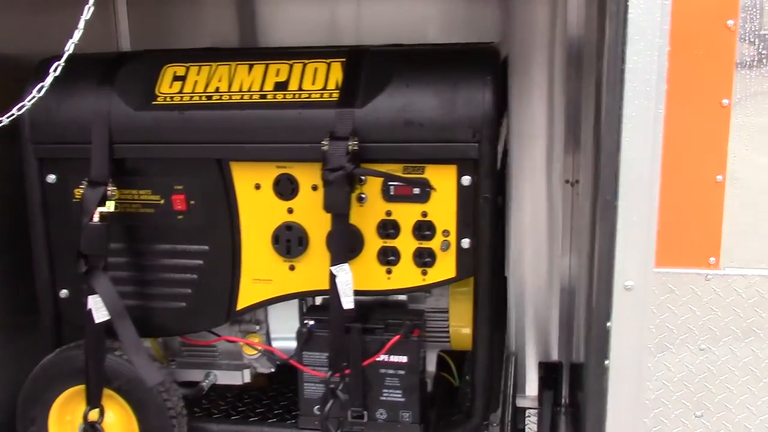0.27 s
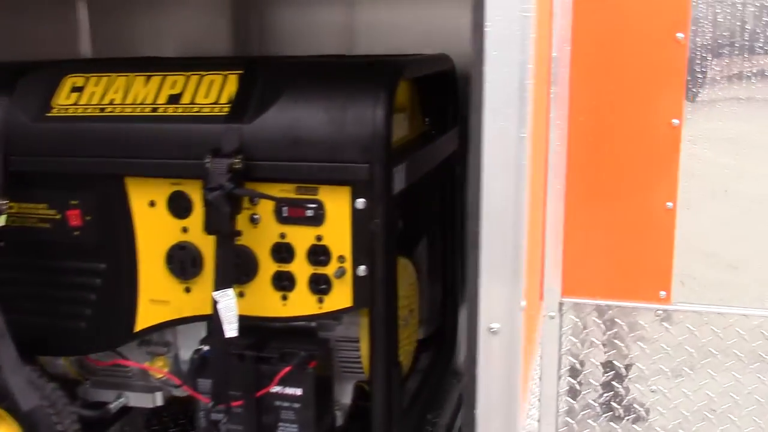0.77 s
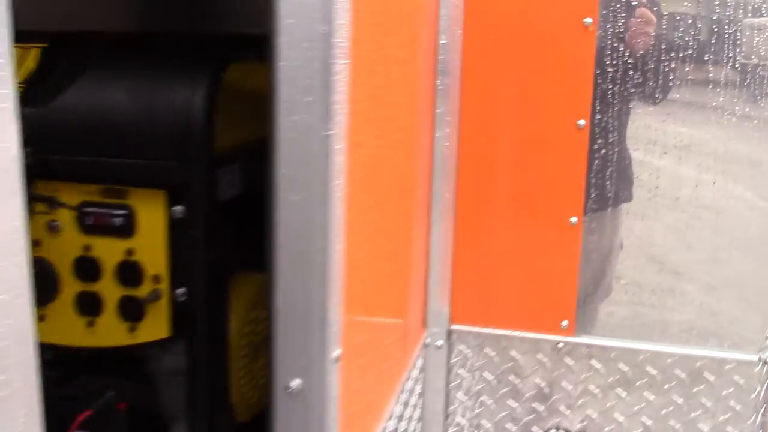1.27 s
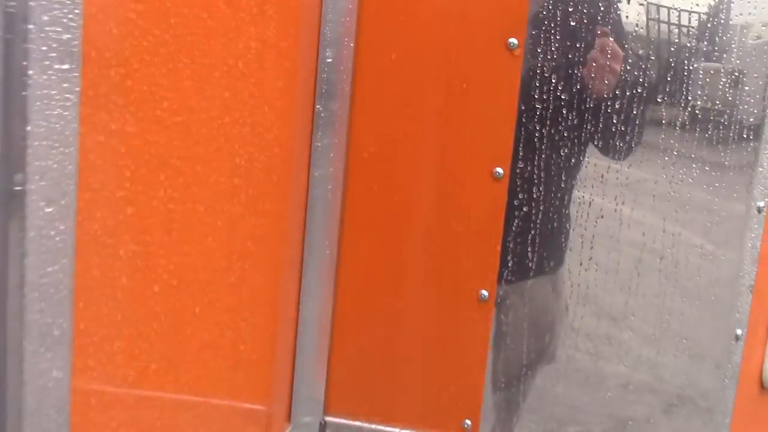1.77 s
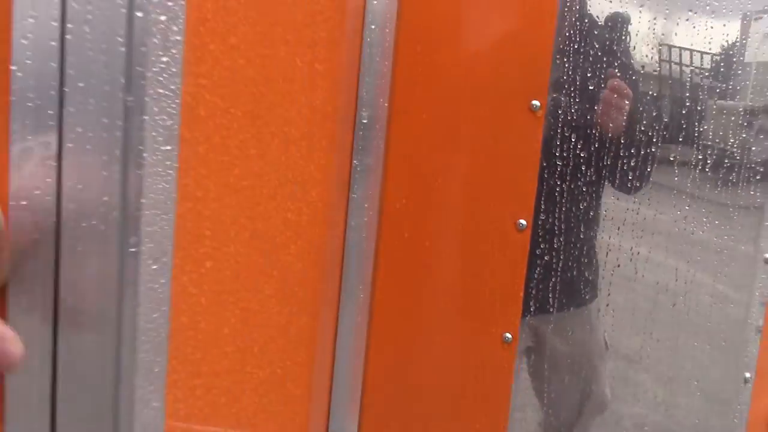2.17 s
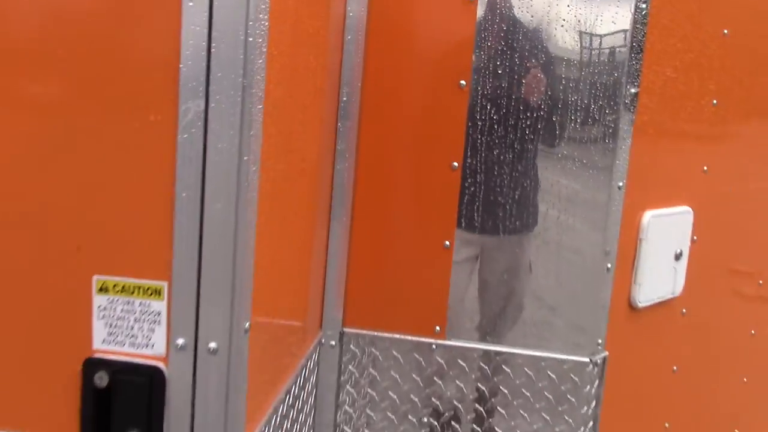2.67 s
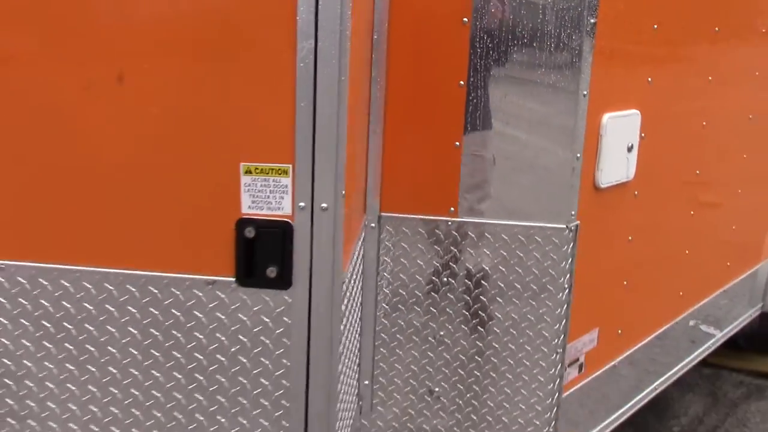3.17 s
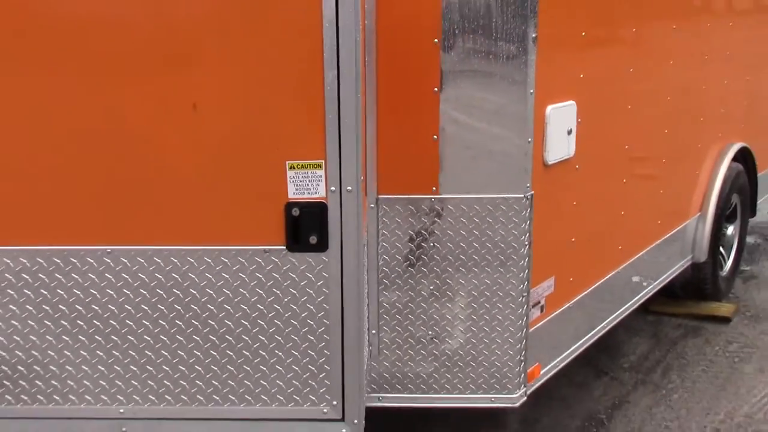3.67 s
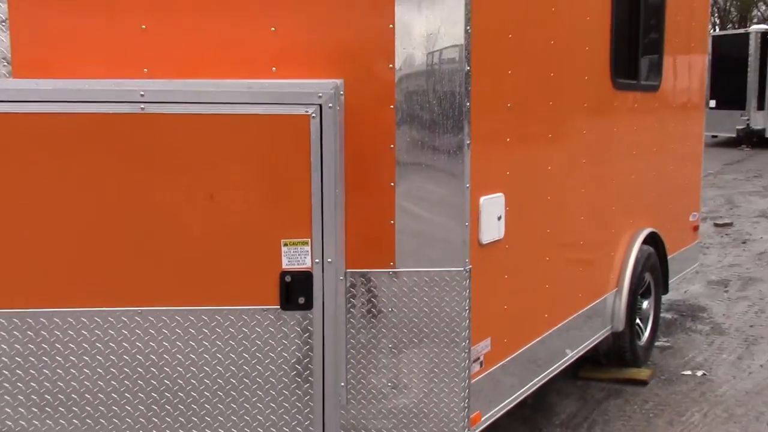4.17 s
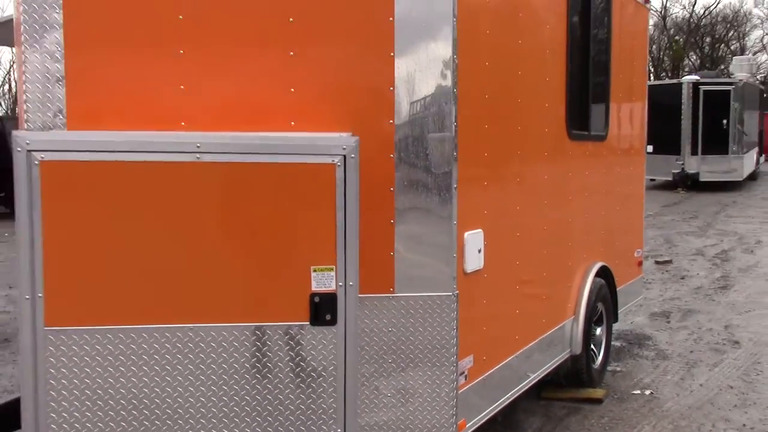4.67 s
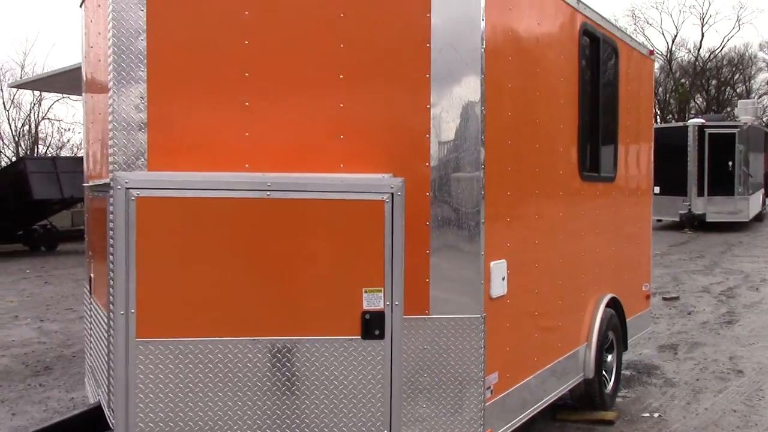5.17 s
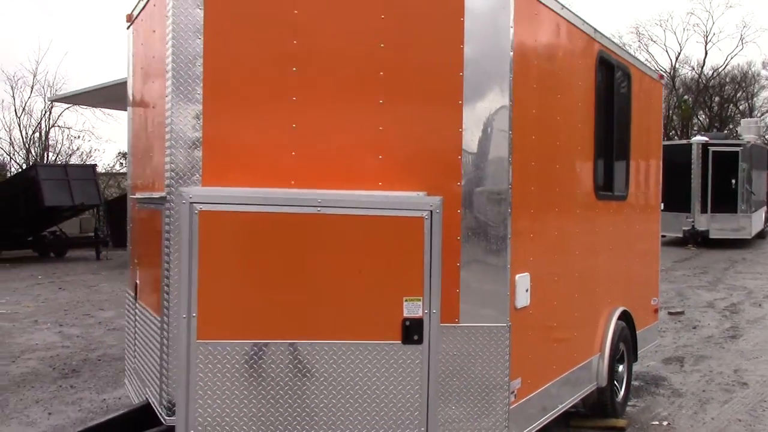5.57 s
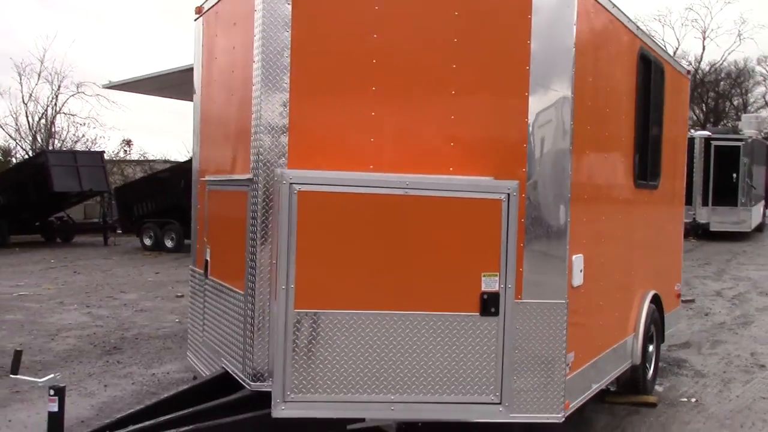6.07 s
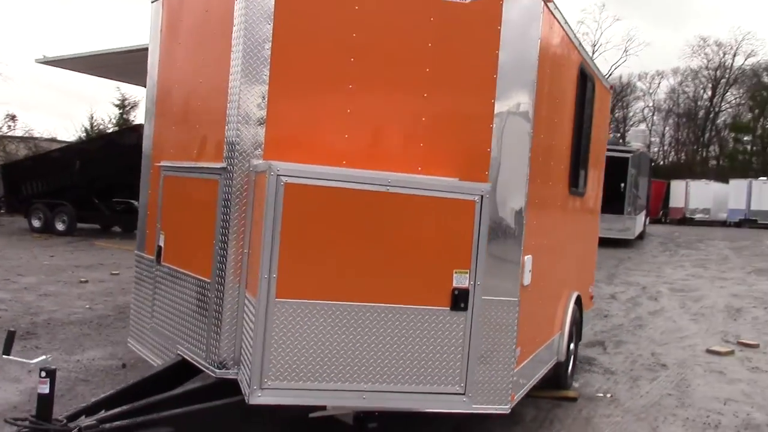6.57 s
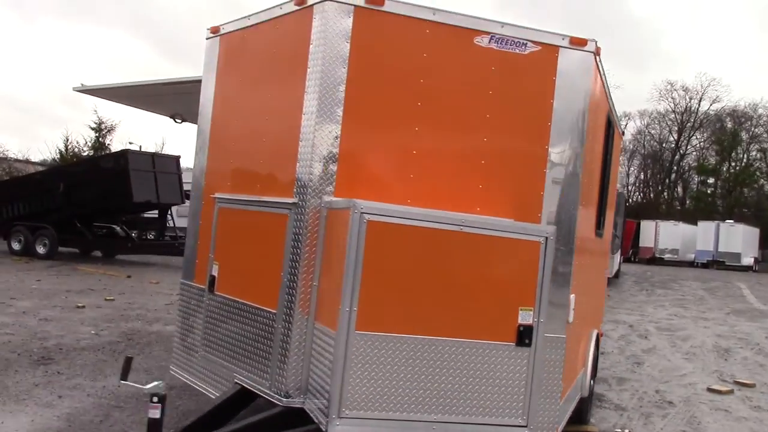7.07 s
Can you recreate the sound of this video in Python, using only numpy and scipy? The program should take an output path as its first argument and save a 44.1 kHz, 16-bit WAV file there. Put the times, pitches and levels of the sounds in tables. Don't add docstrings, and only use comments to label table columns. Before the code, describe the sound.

An open yard, heard close up, with far road hum and low wind buffeting. Soft cloth rustles come at 0.1-0.25 s, a metal tick near 0.47, and a cluster of knocks with short hollow panel thuds around 0.65-0.85. From 0.9 to 1.2 a hook scrapes and chatters on metal. After a brief hand rustle, the sheet-metal door slams at 1.55 with a deep boom, rough panel shudder and a strong push of air; the latch bangs brighter and sharper at 1.82, with a short rattle. The hum then sits lower. Light ticks and gravel scuffs follow from 2.1, with clearer shoe scrapes at 3.1-3.3 and sparse ones later. Thin, wavering squeals sound far away between 4.15 and 5.75. A small low thud comes at 5.9. Wind rumble swells from 6.3 and is heaviest at the end, about 7.3.

```python
import sys
import numpy as np
from scipy import signal
from scipy.fft import rfft, irfft, next_fast_len
from scipy.io import wavfile
from scipy.ndimage import uniform_filter1d

SR = 44100
rng = np.random.default_rng(int(sys.argv[2]) if len(sys.argv) > 2 else 0)


def to_linear_factor(level_db):
    exponent = np.asarray(level_db, float) / 20
    return 10 ** exponent


def store_pcm(level_fs):
    pcm = np.round(np.clip(level_fs, -1, 1) * 32767).astype(np.int16)
    wavfile.write(sys.argv[1], SR, np.atleast_2d(pcm).T)


N = 323253
T = np.arange(N) / SR
SLAM_S = 1.549


def level(x):
    return x / np.sqrt(np.mean(x ** 2))


def band(x, lo_hz, hi_hz, order=2):
    sos = signal.butter(order, [lo_hz, hi_hz], "bandpass", fs=SR, output="sos")
    return signal.sosfilt(sos, x)


def even_band(x, lo_hz, hi_hz):
    return band(x, lo_hz, hi_hz, order=3) / np.sqrt(2 * (hi_hz - lo_hz) / SR)


def coloured(shape):
    hz, db = np.transpose(shape)
    size = next_fast_len(N)
    bin_hz = np.arange(size // 2 + 1) * SR / size
    gain = to_linear_factor(np.interp(np.log(bin_hz + 1), np.log(hz), db))
    return level(irfft(rfft(rng.standard_normal(size)) * gain, size)[:N])


def walk(rate_hz):
    hold = int(SR / rate_hz)
    steps = np.repeat(rng.standard_normal(N // 100), hold)[:N]
    return level(uniform_filter1d(uniform_filter1d(steps, hold), hold))


def ring(x, hz, t60_s):
    pole = np.exp(2j * np.pi * hz / SR - np.log(1000) / (t60_s * SR))
    return signal.lfilter([1], [1, -pole], x).imag


def bursts(table, shape, grit_db, spread, focus_db):
    out, body, edge = np.zeros((3, N + SR))
    size = SR // 6
    t = np.arange(size) / SR
    for start_s, peak_db, hz, body_db, edge_db, span_s in table:
        impacts = np.minimum(rng.exponential(size=size // 30 + 1), 2.5)
        sizes_db = grit_db * np.repeat(impacts, 30)[:size]
        envelope = to_linear_factor(peak_db) * level(to_linear_factor(sizes_db)) * shape(t, max(span_s, .004))
        push = envelope * rng.standard_normal((4, size))
        here = slice(int(start_s * SR), int(start_s * SR) + size)
        out[here] += even_band(push[0], hz / spread, min(hz * spread, 6800))
        out[here] += to_linear_factor(focus_db) * even_band(push[3], hz / 1.093, hz * 1.13)
        body[here] += to_linear_factor(body_db) * push[1]
        edge[here] += to_linear_factor(edge_db) * push[2]
    return (out + even_band(body, 355, 1630) + even_band(edge, 6900, 11900))[:N]


# start_s [s], level_db [dB]
GUST_BEFORE_SLAM = [(0, -28), (.15, -20.5), (.35, -20), (.8, -32), (1.45, -30)]
GUST_AFTER_SLAM = [(1.95, -29.5), (2.3, -39.5), (2.7, -34.5), (4.1, -39.5), (4.75, -32), (5.15, -30),
                   (5.4, -28), (5.9, -27.5), (6.15, -27), (6.35, -19), (6.85, -18.5), (7.0, -14),
                   (7.33, -11)]


def gust():
    usual_db = -30.5
    return np.interp(T, *np.transpose(list(GUST_BEFORE_SLAM) + list(GUST_AFTER_SLAM))) - usual_db


# start_s [s], half_length_s [s], low_push_db [dB], flutter_push_db [dB]
PUFFS = [(0.095, 0.03, 7, 1), (0.39, 0.034, 9.5, -9), (0.572, 0.094, 6.5, -5), (0.935, 0.057, 10.5, 9),
         (1.16, 0.07, 5, 6), (1.416, 0.018, 14, 7), (1.547, 0.045, 16.5, 24), (1.65, 0.075, 18, 31.5),
         (1.857, 0.05, 7, 23.5), (2.262, 0.063, 13, -6), (2.496, .06, -2.5, 8), (3.873, 0.046, 11, -8),
         (4.28, 0.07, 2, 7), (5.03, 0.059, 6.5, 14), (5.18, 0.066, 10.5, 11.5), (5.947, 0.057, 7, 10),
         (6.009, 0.025, 12.5, -1), (6.884, 0.046, 9, 7), (7.083, 0.038, 2.5, 13.5), (7.257, 0.057, -0.5, 8)]


def wind():
    bells = [np.exp(-((T - start_s) / half_s) ** 2) for start_s, half_s, *_ in PUFFS]
    low_db, flutter_db = np.transpose(PUFFS)[2:] @ bells
    # low_hz, high_hz, usual_db, slope (dB per dB of gust), share of flutter in the push
    layers = [(3.94, 20.2, -18, 0.58, 0.015), (23.95, 51, -30.0, 0.94, .02),
              (54, 99.3, -38, 0.74, 0.39), (90.4, 169, -48.5, 0.61, 1.0)]
    out, gust_db = np.zeros(N), gust()
    for lo_hz, hi_hz, usual_db, slope, share in layers:
        eddies = level(band(rng.standard_normal(N), lo_hz, hi_hz, order=3))
        eddies /= np.sqrt(uniform_filter1d(eddies ** 2, int(.1 * SR)) + 0.44)
        push_db = (1 - share) * low_db + share * flutter_db
        out += to_linear_factor(usual_db + slope * gust_db + push_db) * eddies
    return 0.68 * np.tanh(out / 0.73)


# hz [Hz], level_db [dB per Hz]
YARD_SPECTRUM = [(71, -4), (120, 4), (488, -8.5), (899, -8), (1900, -17), (2750, -24), (5060, -28.5),
                 (8080, -40.5), (15500, -48)]
# hz [Hz], level_db [dB per Hz]
COMPARTMENT_SPECTRUM = [(71, -5), (120, -2.5), (188, -5), (240, -9.5), (282, -8), (319, -13.5), (441, -12),
                        (541, -13.5), (975, -14.5), (2590, -25.5), (2980, -29.5), (4570, -30),
                        (15500, -54.5)]
# start_s [s], depth_db [dB], fall_s [s], recovery_s [s]
DUCKS = [
    (1.533, -6, 0.07, 0.0067),
    (1.6, -1, .04, 0.13),
    (1.685, 19, .015, .015),
]


def yard():
    open_db, shut_db, wind_duck = -34, -45.5, 0.071
    flicker_db = .5 * walk(9)
    duck_db = np.zeros(N)
    for start_s, depth_db, fall_s, recovery_s in DUCKS:
        corners_s = [start_s - fall_s, start_s, start_s + recovery_s]
        duck_db += depth_db * np.interp(T, corners_s, [0, 1, 0])
    shut = T > SLAM_S
    heard_db = np.where(shut, shut_db - wind_duck * np.maximum(gust(), 0), open_db)
    hum = np.where(shut, to_linear_factor(5) * coloured(YARD_SPECTRUM), to_linear_factor(4.5) * coloured(COMPARTMENT_SPECTRUM))
    return hum * to_linear_factor(heard_db - duck_db + flicker_db)


# start_s [s], peak_db [dB], edge_db [dB re peak], length_s [s]
CLOTH = [
    (0.1176, -26.5, -7.5, 0.025),
    (0.167, -24.5, -27, 0.018),
    (0.227, -32, -18, 0.026),
    (1.393, -31.5, -12, 0.029),
    (1.437, -26, -13, 0.012),
    (1.715, -38.5, -24, 0.02),
    (1.83, -22.5, -9, 0.027),
    (1.866, -39, -15, 0.12),
    (1.977, -38, -16, 0.023),
    (2.034, -44.5, -11, 0.054),
]
# start_s [s], peak_db [dB], centre_hz [Hz], edge_db [dB re peak], length_s [s]
SCRAPES = [(0.908, -35, 2520, -26, 0.011), (0.927, -15.5, 5160, -15, 0.02), (0.943, -10, 4370, -25, 0.013),
           (0.992, -20.5, 2140, -16, 0.027), (1.046, -18, 3470, -12.5, 0.012),
           (1.055, -20, 2350, -15, 0.024), (1.113, -22.5, 2070, -31, 0.031),
           (1.13, -18.5, 2320, -33, 0.013), (1.1397, -18, 1900, -18.5, 0.014),
           (1.207, -26.5, 4500, -20, 0.017), (3.1905, -29, 1870, -34, 0.015),
           (3.2, -27.5, 1700, -44, 0.015), (3.301, -27.5, 1720, -3, 0.021)]
# start_s [s], peak_db [dB], edge_db [dB re peak], length_s [s]
GRAVEL = [(2.106, -43, -6, 0.049), (2.168, -39.5, -10, 0.059), (2.24, -47, -12, 0.031),
          (2.303, -40, -24, 0.027), (2.358, -37.5, -15, 0.026), (2.45, -46, -13, 0.11),
          (3.173, -42, -27, 0.032), (3.388, -48, 5, 0.016), (3.792, -41.5, -22, 0.054),
          (4.38, -47, -7, 0.056), (4.47, -42, -20, 0.056), (4.992, -47, -5, 0.039),
          (5.0494, -46.5, -8, 0.067), (5.096, -48, -15, 0.046), (5.179, -42.5, -17, 0.028),
          (5.917, -45, -37, 0.016), (6.592, -45.5, -20, 0.065), (6.636, -45, -12, 0.037),
          (7.11, -46, -6, 0.13), (7.138, -32, -22, 0.022)]
# start_s [s], peak_db [dB], edge_db [dB re peak], length_s [s]
SCUFFS = [
    (2.127, -34.5, -21, 0.056),
    (3.071, -38.5, -14, 0.084),
    (3.293, -28.5, -7, 0.02),
    (3.844, -40.5, -25, 0.081),
    (3.906, -33, -16, 0.023),
    (4.554, -35.5, -13, 0.029),
]


def scrapes():
    drags = [(s, db, hz, -1, edge_db, span_s) for s, db, hz, edge_db, span_s in SCRAPES]
    rustles = []
    # centre_hz, body_db re peak
    for table, hz, body_db in [(CLOTH, 5000, 2), (GRAVEL, 4400, -10), (SCUFFS, 4000, 1.5)]:
        rustles += [(s, db, hz, body_db, edge_db, span_s) for s, db, edge_db, span_s in table]

    def bite(t, span_s):
        return np.minimum(t / 0.0037, 1) * np.exp(-(t / span_s) ** 1.24)

    def swell(t, span_s):
        return np.minimum(t / 0.0076, 1) * np.exp(-t / span_s)

    metal = bursts(drags, bite, grit_db=5.5, spread=2.3, focus_db=-1)
    soft = bursts(rustles, swell, grit_db=3.5, spread=1.465, focus_db=-26)
    return to_linear_factor(-9) * metal + to_linear_factor(-9) * soft


# start_s [s], peak_db [dB], centre_hz [Hz], body_db [dB re peak], edge_db [dB re peak]
KNOCKS = [(0.466, -28, 2500, -9, -34), (0.4762, -15, 2610, -17, -34), (0.646, -25.5, 2620, 10.5, -31),
          (0.6998, -15, 5600, -20, -9), (0.703, -26, 5100, 1, -5), (0.7239, -16, 6000, -3, -17),
          (0.7338, -20.5, 5340, 0.5, -4.5), (0.845, -24, 5840, -7, -4), (0.951, -20, 4400, -1, -18),
          (1.1325, -19, 2220, 8, -31), (1.5489, -2.5, 2910, -1.5, -23), (1.628, -27, 2330, 6, -25),
          (1.744, -32.5, 2340, 15, -20), (1.7698, -19, 4900, -7, -8), (1.7881, -22.5, 5700, 6, -12),
          (1.8211, -4.5, 2160, -13, -7), (1.8344, -10.5, 1500, -5.5, -23)]
# start_s [s], peak_db [dB], centre_hz [Hz], edge_db [dB re peak]
TICKS = [(1.9074, -42, 4270, -10), (1.9468, -31.5, 5910, -11), (1.9816, -38, 5610, -8),
         (2.002, -36, 6200, -12), (2.534, -26, 5000, -25), (3.016, -42, 5340, -25), (3.207, -32, 4370, -27),
         (3.4017, -44.5, 6350, 8), (3.4346, -38.5, 4700, -29), (3.5234, -37, 6180, -8),
         (5.924, -34, 3600, -35), (5.942, -36.5, 3600, -34), (6.8834, -49, 4000, -2),
         (7.0664, -38, 4370, -10), (7.077, -35.5, 4430, 3), (7.0988, -37, 4540, 5.5),
         (7.224, -38.5, 4040, -18)]
# start_s [s], peak_db [dB]
SNAPS = [
    (1.621, -39),
    (1.651, -47),
    (1.676, -43.5),
    (2.126, -40),
]


def knocks():
    knock_t60_s, tick_t60_s, snap_t60_s = 0.046, 0.043, .012
    hits = [(*row, knock_t60_s) for row in KNOCKS]
    hits += [(s, db, hz, -18, edge_db, tick_t60_s) for s, db, hz, edge_db in TICKS]
    hits += [(s, db, 4500, -8, -4, snap_t60_s) for s, db in SNAPS]

    def crack(t, t60_s):
        tick = 0.47 * np.exp(-t / 0.00061)
        tail = 0.025 * to_linear_factor(-15 * t / t60_s)
        return tick + to_linear_factor(-60 * t / t60_s) + tail

    return to_linear_factor(-10) * bursts(hits, crack, grit_db=-3.0, spread=2.04, focus_db=-6)


# start_s [s], pitch_hz [Hz], peak_db [dB], t60_s [s]
BOOMS = [(0.728, 482, -17, 0.059), (.732, 696, -13, 0.034), (0.744, 260, -11.5, 0.026),
         (1.554, 111, -30, 0.21), (1.58, 80, -3.5, 0.25), (1.618, 132.5, -32, 0.066),
         (1.625, 7700, -44, 0.07), (1.625, 346, -10.5, 0.061), (1.749, 180, -14, 0.043),
         (1.837, 327, -19, 0.096), (1.841, 96, -22, 0.16), (3.005, 346, -18, 0.013),
         (4.373, 400, -30, 0.056), (5.915, 118, -14.5, 0.1)]


def booms():
    out, t = np.zeros(N), np.arange(SR // 3) / SR
    for start_s, hz, peak_db, t60_s in BOOMS:
        onset = 1 - np.exp(-t * hz * 4.7)
        boom = to_linear_factor(peak_db - 60 * t / t60_s) * onset * np.sin(2 * np.pi * hz * t)
        out[int(start_s * SR):][:len(t)] += boom
    return out


# pitch_hz [Hz], width_hz [Hz], level_db [dB]
FRAME_MODES = [(418, 100, -6), (640, 39, -16.5), (1354, 84, 3), (1500, 48, 0), (2230, 150, 13.5),
               (2620, 97, 3), (3520, 90, -24), (4200, 120, -27), (4700, 150, -21), (5840, 110, -11)]
LATCH_MODES = [(908, 70, -6.5), (925, 30, -9), (1253, 26, -7.5), (1510, 71, -14.5), (1590, 33, -11),
               (1723, 26, -8.5), (2074, 340, 10.5), (3200, 90, -46), (4370, 130, -19), (5600, 110, 9),
               (7260, 160, 11), (7700, 200, -29)]
# start_s [s], level_db [dB], which [0 frame, 1 latch]
BLOWS = [
    (1.549, -28.5, 0),
    (1.553, -23.5, 0),
    (1.628, -54, 0),
    (1.744, -47, 1),
    (1.771, -34.5, 1),
    (1.821, -18.5, 1),
    (1.826, -19, 1),
    (1.835, -36, 1),
    (1.844, -35, 1),
]


def fittings():
    out, t = np.zeros(N), np.arange(SR // 8) / SR
    for start_s, blow_db, which in BLOWS:
        for hz, width_hz, mode_db in (FRAME_MODES, LATCH_MODES)[int(round(which))]:
            push = np.exp(-t / 0.00099) * rng.choice([-1, 1]) * to_linear_factor(2 * rng.standard_normal())
            struck_hz = hz * (1 + 0.018 * rng.standard_normal())
            out[int(start_s * SR):][:len(t)] += to_linear_factor(blow_db + mode_db) * ring(push, struck_hz, 1.27 / width_hz)
    return out


# start_s [s], peak_db [dB]
SHUDDERS = [
    (1.55, -24),
    (1.576, -15.5),
    (1.6, -18),
    (1.632, -19),
    (1.79, -18),
    (1.846, -26),
]


def shudder():
    rise_s, t60_s = 0.023, 0.21
    rattle = level(band(rng.standard_normal(N) * to_linear_factor(9.8 * walk(80)), 143, 455))
    shake = np.zeros(N)
    for start_s, peak_db in SHUDDERS:
        decay = to_linear_factor(peak_db - 60 * np.maximum(T - start_s, 0) / t60_s)
        shake += decay * np.clip(1 + (T - start_s) / rise_s, 0, 1)
    return rattle * shake * to_linear_factor(-6)


# start_s [s], length_s [s], first_hz [Hz], last_hz [Hz], level_db [dB]
SQUEALS = [
    (4.15, .18, 1610, 1540, -53),
    (4.64, .36, 1720, 1830, -53),
    (5.12, .1, 1650, 1800, -55),
    (5.2, .55, 1935, 1935, -54),
]


def squeals():
    fade_s, sag_db_per_s, bend = .03, 6, 3
    out, waver, flicker = np.zeros(N), 1 + .004 * walk(40), to_linear_factor(1.5 * walk(20))
    for start_s, span_s, first_hz, last_hz, level_db in SQUEALS:
        part = slice(int(start_s * SR), int((start_s + span_s) * SR))
        t = np.maximum(T[part] - start_s, 0)
        fade = np.clip(np.minimum(t, span_s - t) / fade_s, 0, 1) * to_linear_factor(level_db - sag_db_per_s * t)
        pitch_hz = (first_hz + (last_hz - first_hz) * (t / span_s) ** bend) * waver[part]
        out[part] += fade * flicker[part] * np.sin(2 * np.pi * np.cumsum(pitch_hz) / SR)
    return out


def scene():
    air = yard() + scrapes() + knocks() + booms() + fittings() + shudder() + squeals()
    gusts = wind()
    side = to_linear_factor(-19) * np.roll(band(air, 11000, 16000), shift=7)
    side += to_linear_factor(-40) * gusts * walk(30)
    return air + gusts + np.array([side, -side])


def band_limit(x):
    return signal.sosfilt(signal.butter(12, 16010, fs=SR, output="sos"), x)


def record(dry):
    mix = np.clip(dry, -1, 1)
    return band_limit(mix)


dry = scene()
out = record(dry)
store_pcm(out)
```